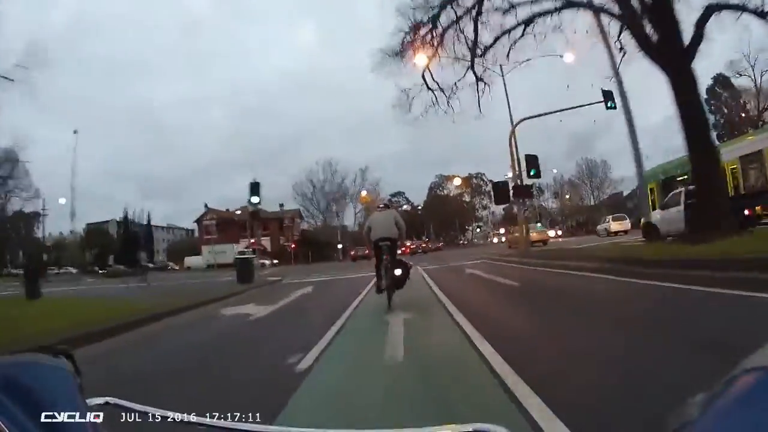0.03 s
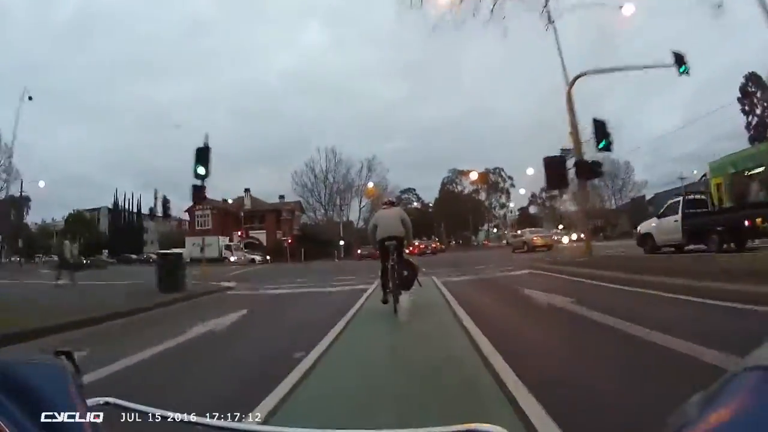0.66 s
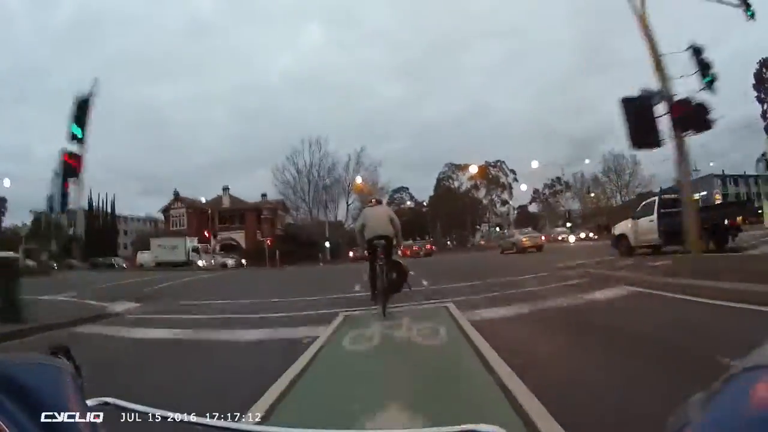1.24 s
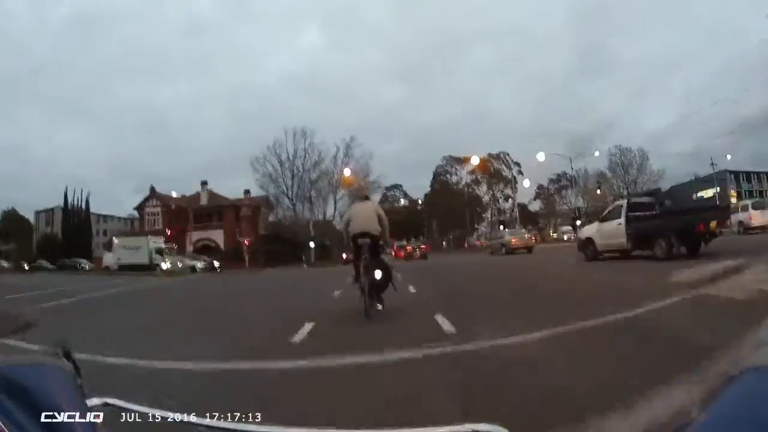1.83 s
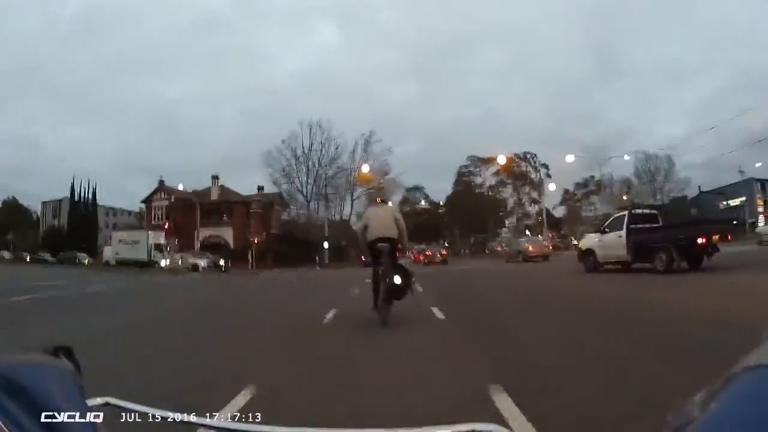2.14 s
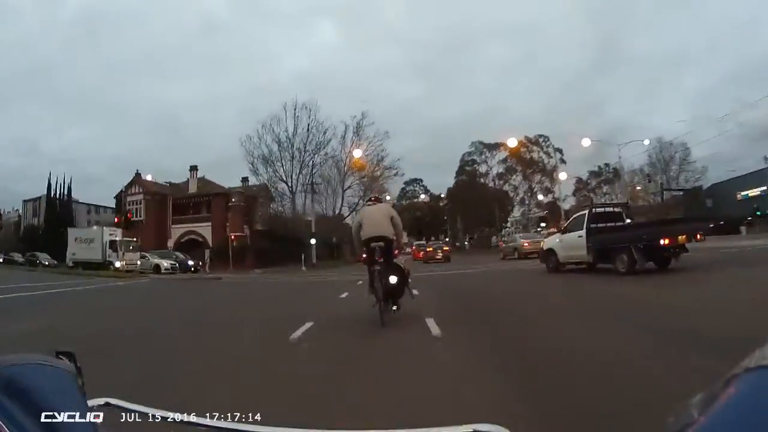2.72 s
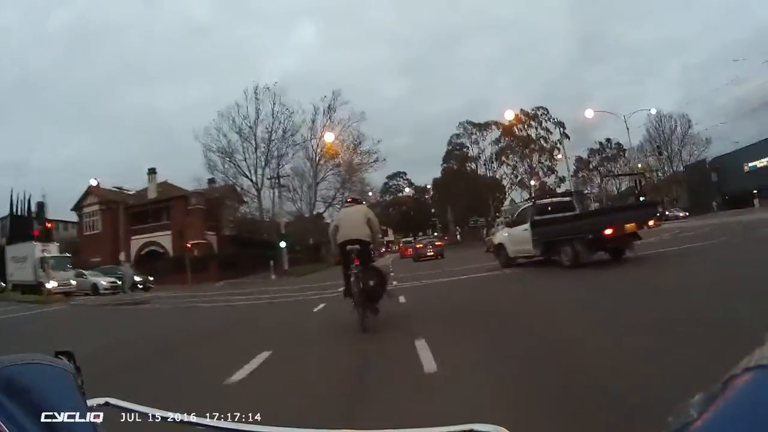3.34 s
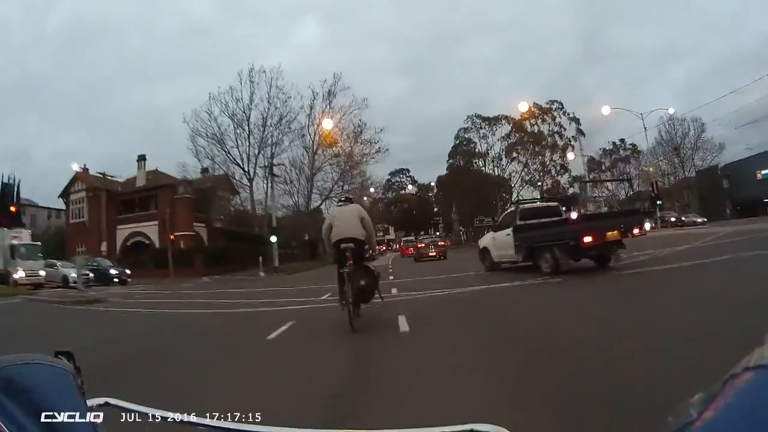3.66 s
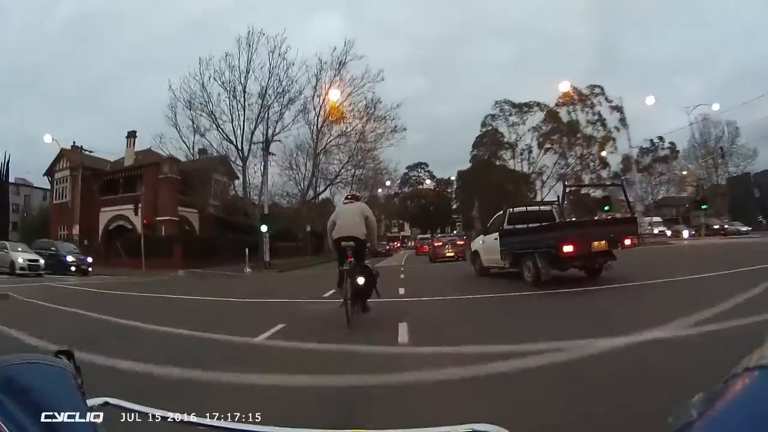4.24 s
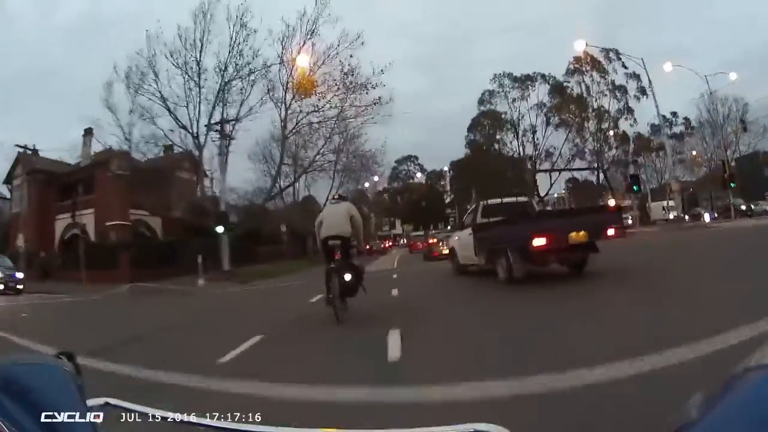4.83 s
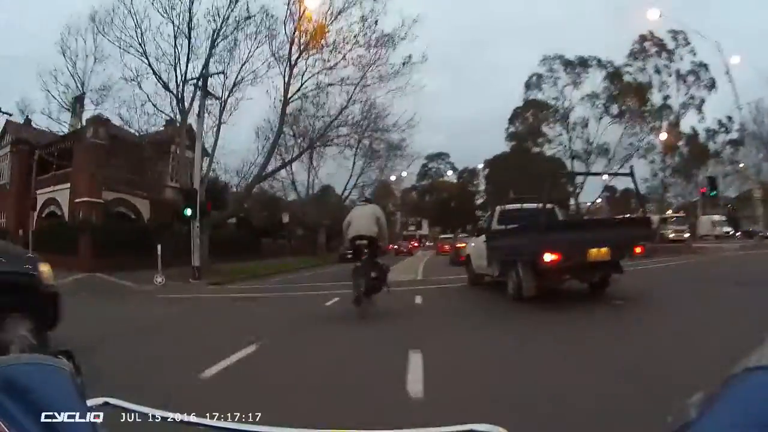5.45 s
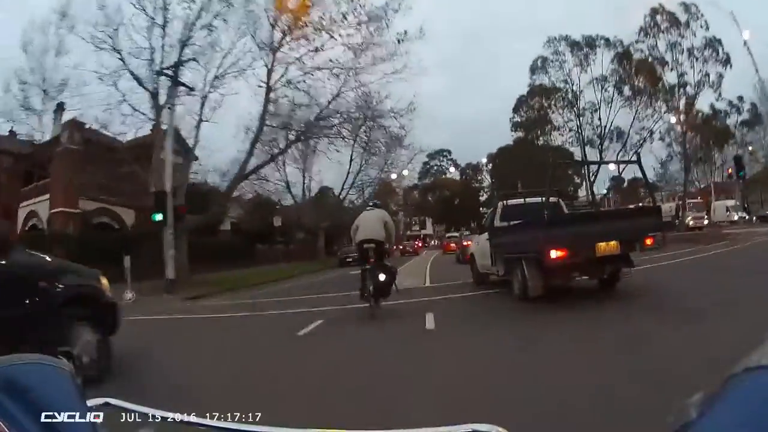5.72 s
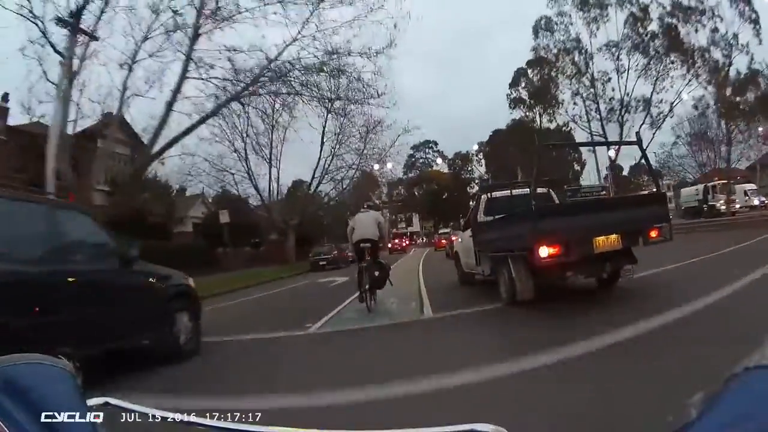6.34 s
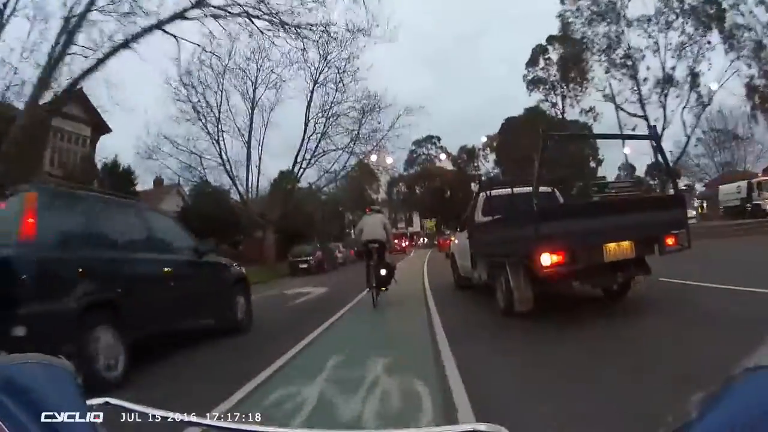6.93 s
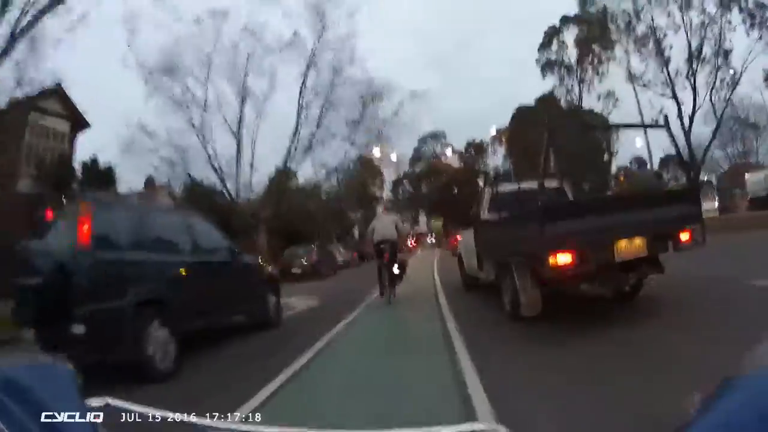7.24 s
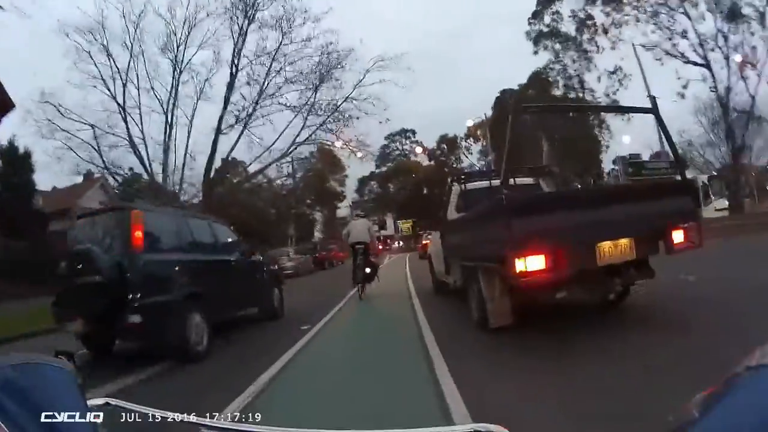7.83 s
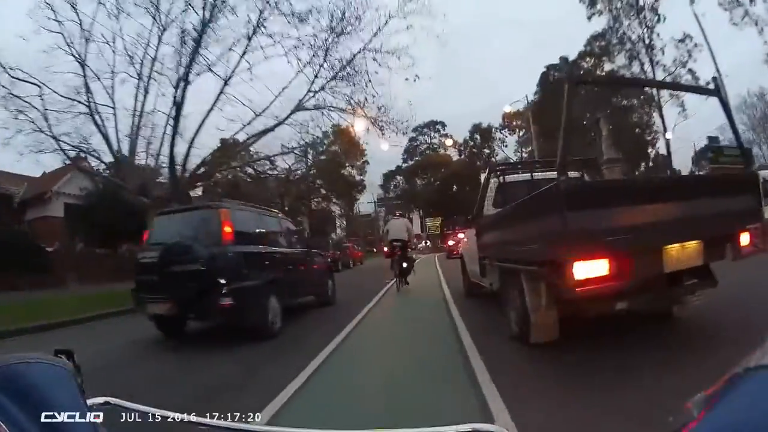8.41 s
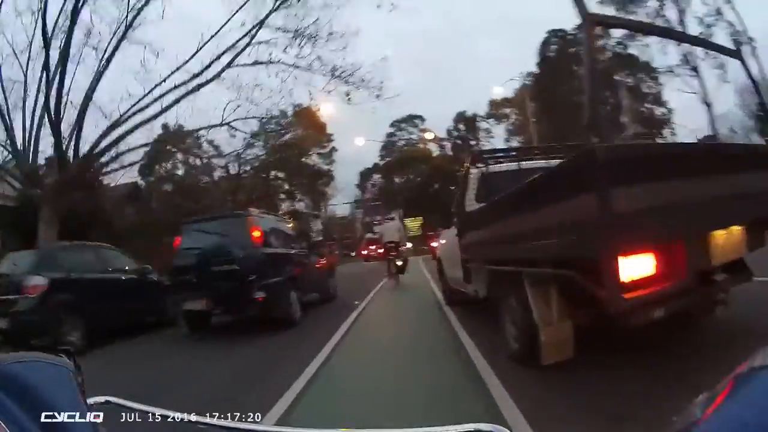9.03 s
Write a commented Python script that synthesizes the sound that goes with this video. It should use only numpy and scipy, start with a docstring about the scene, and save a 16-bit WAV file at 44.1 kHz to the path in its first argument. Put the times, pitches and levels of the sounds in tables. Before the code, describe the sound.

A bicycle rides through a city intersection, heard from a microphone on the handlebar. Rough asphalt hums low through the bike while wind buffets and crackles in gusts. The freewheel pings softly at first, then gives way to a faint chain whirr and a low throb of pedalling. Loose fittings knock now and then, and two harder bumps come near the end. Cars rush faintly alongside.

```python
"""A bicycle rolls through a city intersection, heard from a camera on its handlebar.
Rough asphalt hums through the frame; seams thump and loose fittings rattle. The rider coasts
on a pinging freewheel and pedals in spells with a whirring chain. Wind buffets the microphone and
crackles in the gusts; the camera's limiter ticks at loud peaks. Slow cars rush alongside.
The camera's plastic housing colours everything but the ticks and the crackle."""
import sys
import numpy as np
from scipy import signal
from scipy.fft import rfft, irfft, next_fast_len
from scipy.io import wavfile
from scipy.ndimage import uniform_filter1d, map_coordinates

SR = 44100
rng = np.random.default_rng(int(sys.argv[2]) if len(sys.argv) > 2 else 0)


def store_pcm(level_fs):
    """Save levels as 16-bit WAV."""
    pcm = np.round(np.clip(level_fs, -1, 1) * 32767).astype(np.int16)
    wavfile.write(sys.argv[1], SR, np.atleast_2d(pcm).T)


N = 404397

# how hard the road shakes the bicycle: (time [s], level [dB])
ROAD_SHAKE = [(0, 6), (0.16, 1), (0.32, 5.5), (0.5, -1), (0.7, 1), (0.93, -0.5), (1.2, 3.5), (1.83, 0.5),
              (2.1, -1.5), (2.72, -3.5), (3.2, -0.5), (3.9, -1.5), (4.5, 2), (6.1, 2.5), (7.05, 0),
              (7.55, -2.5), (8.47, -2), (8.8, 0), (9.17, 0.5)]
# fader ride of the low throb: (time [s], level [dB])
THROB_LEVEL = [(0, -28.5), (0.27, -35), (0.4, -23.5), (0.6, -41), (1.6, -34), (1.88, -29), (2.75, -36.5),
               (4.4, -26), (4.9, -27), (6.3, -26.5), (7.6, -31), (9.17, -32)]
# tone of the frame's hum, the throb and the tyres' drone: (frequency [Hz], level [dB])
HUM_TONE = [(30, -25), (60, -9.5), (100, -8), (130, -8), (155, 1), (190, -2.5), (220, -13.5), (320, -41.5),
            (1000, -120)]
THROB_TONE = [(60, -55), (98, -13.5), (118, -1), (132, -1), (146, -4), (168, -14), (450, -120)]
DRONE_TONE = [(120, -20), (215, -3.5), (280, 2.5), (320, -8), (360, -3), (388, -8.5), (428, -1),
              (495, -16.5), (535, -13), (600, -24.5), (700, -18), (1000, -31), (2400, -40), (9000, -120)]


def road(hum_db=-32, hum_follow=0.87, drone_db=-39, stroke_db=2):
    """Asphalt shakes the frame's low resonances, a throb pumps with the pedals, the tyres drone."""
    road_db, = curves(ROAD_SHAKE)
    throb_db, = curves(THROB_LEVEL)
    hum = amp(hum_db + hum_follow * road_db) * even(noise(HUM_TONE), span_s=0.32)
    throb = amp(throb_db + stroke_db * pedal_strokes()) * even(noise(THROB_TONE), span_s=0.23)
    drone = amp(drone_db + road_db + 1.4 * wobble(30)) * noise(DRONE_TONE)
    return hum + throb + drone


# surges of the low throb: (crest time [s], width [s], level [dB])
THROB_SURGES = [(1.84, 0.13, -23.5), (2.257, 0.087, -22), (4.85, 0.083, -20), (5.019, 0.043, -16),
                (5.201, 0.071, -20.5), (5.497, 0.064, -26.5), (5.976, 0.084, -19.5), (6.317, 0.064, -15.5),
                (6.87, 0.04, -20.5), (7.03, 0.089, -20.5)]


def throb_surges(centre_hz=136, waver=0.0819):
    """The low throb surges briefly near 136 Hz, unsteady in pitch."""
    t = np.arange(N) / SR
    envelope = sum(amp(db) * swell(t, s, width) for s, width, db in THROB_SURGES)
    pitch_hz = centre_hz * (1 + waver * wobble(60))
    return envelope * np.sin(2 * np.pi * np.cumsum(pitch_hz) / SR)


# the wheels hit seams in the road: (time [s], level [dB], hardness [dB/octave])
SEAMS = [(0.681, -25.5, -1), (3.422, -26.5, -2), (5.372, -25.5, 4.5), (7.208, -7.5, -1.5),
         (7.237, -18.5, -1), (7.409, -26, -4), (8.811, -31.5, 9.5), (8.821, -13.5, 1.5)]
# ring of the handlebar: (frequency [Hz], level [dB], t60 [s])
HANDLEBAR_MODES = [(34.96, -8.5, 0.61), (60.5, -9, 0.19), (127, -4, 0.18), (167.5, -0.5, 0.13),
                   (278, -12, 0.046), (413, -13.5, 0.054), (645, -24, 0.044), (1210, -29, 0.036)]


def bumps(attack_s=0.002, pivot_hz=165):
    """Each seam jolts the handlebar into a deep shudder; a hard edge brings out the upper modes."""
    out, t = np.zeros(N), np.arange(SR // 2) / SR
    for s, db, hardness in SEAMS:
        shudder = sum(mode(t, hz, level + hardness * np.log2(hz / pivot_hz), t60)
                      for hz, level, t60 in HANDLEBAR_MODES)
        add(out, s, amp(db) * shudder * (1 - np.exp(-t / attack_s)))
    return out


# metal on metal at the big jolt, and dull clunks of the camera's mount: (time [s], level [dB])
METAL_HITS = [(7.2165, -27)]
MOUNT_HITS = [(0.6755, -26), (5.94, -31)]
# ring of the metal and of the mount: (frequency [Hz], level [dB], t60 [s])
METAL_MODES = [(2040, 2.5, 0.0094), (3150, 0.5, 0.0071), (3410, -5, 0.0067), (4400, -5, 0.0066),
               (5100, -12, .006), (10400, -10, 0.0045), (10900, -10, .004)]
MOUNT_MODES = [(424, 0, 0.036), (620, -1.5, .02), (830, -9, 0.011)]


def blows(hits, modes, attack_s):
    """Each blow rings the struck part's few damped modes."""
    out, t = np.zeros(N), np.arange(SR // 10) / SR
    ring = sum(mode(t, hz, level, t60) for hz, level, t60 in modes)
    for s, db in hits:
        add(out, s, amp(db) * ring * (1 - np.exp(-t / attack_s)))
    return out


# knocks of the loose fittings: (time [s], level [dB], clack offset [dB], edge offset [dB])
KNOCKS = [(0.3619, -40, 3, -19), (0.454, -36, -6, -33), (1.561, -42, -5, -28), (1.87, -42.5, 2, -8),
          (2.246, -38, -2, -16), (2.329, -48, 5, 8), (3.4237, -30, -16, -19), (4.726, -34, -13, -30),
          (5.374, -30, -5, -16.5), (5.9389, -29.5, -4, -6.5), (6.414, -33, -6, -18),
          (7.199, -34.5, -1, -14), (7.2255, -29.5, -8, -28), (7.23, -43, 6, -26), (7.2942, -40, -3, -17),
          (7.3332, -36, -14, -26), (7.366, -42.5, 4, -21), (7.379, -37, 0, -17), (7.394, -41, -11.5, -24),
          (7.439, -39, -10, -24), (7.542, -37, -2, -6.5), (8.05, -31, -6.5, -3), (8.806, -35, 0.5, -12),
          (8.8123, -33, -1, -5.5), (9.002, -40.5, -4.5, -21)]
# ring of the fittings: (frequency [Hz], level [dB], t60 [s])
FITTING_MODES = [(1166, -15.5, 0.05), (2424, -1.5, 0.026), (2580, 4, 0.022), (2903, -7, .03),
                 (3436, -15.5, 0.034), (4320, -26.5, 0.032), (6200, -30.5, 0.04)]
# tone of a knock's clack and edge: (frequency [Hz], level [dB])
CLACK_TONE = [(300, -12.5), (1200, -3), (2100, 1), (3000, -13), (5000, -26), (9000, -35), (13000, -52.5)]
EDGE_TONE = [(1000, -20.5), (2400, -3), (3100, 2), (4000, -5), (5000, -9), (6300, -3.5), (7700, -9),
             (9000, -9), (11000, -18), (12300, -34)]


def rattle(ring_db=-6, clack_db=-2, edge_db=-5, clack_t60=0.042, edge_t60=0.009, attack_s=0.00065):
    """Loose fittings knock: a dull clack, a bright edge and a brief ring that varies hit to hit."""
    ring, clack, edge = np.zeros((3, N))
    t = np.arange(SR // 10) / SR
    rise = 1 - np.exp(-t / attack_s)
    for s, db, body_db, bright_db in KNOCKS:
        modes = sum(mode(t, db=level + rng.normal(0, 1.3), hz=hz * rng.normal(1, 0.019), t60=t60)
                    for hz, level, t60 in FITTING_MODES)
        add(ring, s, amp(db + ring_db) * rise * modes)
        add(clack, s, amp(db + body_db + clack_db - 60 * t / clack_t60) * rise)
        add(edge, s, amp(db + bright_db + edge_db - 60 * t / edge_t60) * rise)
    return ring + clack * noise(CLACK_TONE) + edge * noise(EDGE_TONE)


# how hard the fittings buzz: (time [s], level [dB])
BUZZ_LEVEL = [(0, -58.5), (2.6, -70.5), (3.1, -53), (4.4, -53.5), (7, -50), (7.7, -54.5), (8.2, -51),
              (8.5, -57), (8.8, -44), (9.17, -50.5)]


def chatter(taps_per_s=55, spread_db=2, attack_s=0.0029, detune=0.022):
    """The same fittings buzz faintly, each mode tapped at its own random moments, slightly detuned."""
    buzz_db, = curves(BUZZ_LEVEL)
    out, t = np.zeros(N), np.arange(SR // 25) / SR
    rise = 1 - np.exp(-t / attack_s)
    for hz, db, t60 in FITTING_MODES:
        taps = np.flatnonzero(rng.random(N) < taps_per_s / SR)
        size, pitch = rng.standard_normal((2, N))
        for at in taps:
            tap_db = buzz_db[at] + db + spread_db * size[at]
            add(out, at / SR, rise * mode(t, hz * (1 + detune * pitch[at]), tap_db, t60))
    return out


# spells of pedalling: (start [s], release [s])
PEDAL_SPELLS = [(2.8, 6), (7.2, 7.3), (8.35, 9.17)]


def pedal_load(take_up_s=0.61, let_go_s=0.35):
    """Load on the pedals, 0 to 1: the legs take it up and let it go in each spell."""
    t = np.arange(N) / SR
    ramps = [np.minimum((t - start) / take_up_s, 1 - (t - end) / let_go_s)
             for start, end in PEDAL_SPELLS]
    return np.clip(ramps, 0, 1).max(axis=0)


def pedal_strokes(strokes_per_s=2.65, downstroke_at_s=5.94):
    """The swing of the pedal strokes, -1 to 1, still while coasting."""
    return pedal_load() * np.cos(2 * np.pi * strokes_per_s * (np.arange(N) / SR - downstroke_at_s))


# fader ride of the chain: (time [s], level [dB])
CHAIN_LEVEL = [(0, -84.5), (2.6, -84.5), (3, -77), (3.4, -71.5), (3.9, -72), (4.55, -66.5), (4.8, -76),
               (5, -70.5), (5.6, -69), (6.25, -66.5), (6.9, -69.5), (7.7, -74.5), (8.05, -66.5), (8.3, -75),
               (8.55, -81), (8.8, -73), (9.17, -71)]
# ring of the links: (frequency [Hz], width [Hz], level [dB])
LINK_BANDS = [(2540, 110, 6), (2866, 70, 5), (3110, 91, 0), (3544, 65, 3), (4440, 65, -5.5),
              (6400, 110, -7), (7120, 150, 2), (7950, 230, -16), (8560, 250, -14.5)]


def chain(links_per_s=65, grain=0.7, flutter_db=1.2, stroke_db=1.4, road_follow=0.46, drift=0.002):
    """Links seat on the sprockets and ring in narrow, drifting bands, louder on each pedal stroke."""
    effort_db, = curves(CHAIN_LEVEL)
    road_db, = curves(ROAD_SHAKE)
    link_phase = 2 * np.pi * np.cumsum(links_per_s * (1 + 0.049 * wobble(12))) / SR
    bands = lambda hz: sum(amp(db) * resonance(hz, centre, width) for centre, width, db in LINK_BANDS)
    ring = filtered(rng.standard_normal(N), bands)
    ring = map_coordinates(ring, [np.cumsum(1 + drift * wobble(6))], mode="mirror")  # varispeed
    level_db = effort_db + road_follow * road_db + stroke_db * pedal_strokes() + flutter_db * wobble(25)
    return amp(level_db) * unit(ring * (1 + grain * np.cos(link_phase)))


def drive_whirr(ring_hz=4400, width_hz=110, crest_s=4.5, width_s=1.2, level_db=-81, flutter_db=3):
    """For a while the drive rubs and sings roughly on one narrow metallic band."""
    envelope = amp(level_db + flutter_db * wobble(50)) * swell(np.arange(N) / SR, crest_s, width_s)
    ring = filtered(rng.standard_normal(N), lambda hz: resonance(hz, ring_hz, width_hz))
    return envelope * unit(ring)


def freewheel(pings_per_s=30, level_db=-54.5, partials_hz=(2490, 2850, 4420), rise_s=0.0034,
              jitter_s=0.009, road_follow=0.66, roughness=0.25):
    """The pawls ping softly and unevenly as the bicycle coasts, louder on rough asphalt."""
    road_db, = curves(ROAD_SHAKE)
    coasting = (1 - pedal_load()) * amp(road_follow * road_db + 2.2 * wobble(7))
    clicks = np.flatnonzero(np.diff(np.floor(np.arange(N) * pings_per_s / SR)))
    out, t = np.zeros(N), np.arange(SR // 25) / SR
    envelope = (t / rise_s) ** 2 * np.exp(2 * (1 - t / rise_s))
    for at in clicks:
        late, size, pitch, bright = rng.standard_normal(4)
        low, mid, top = (np.sin(2 * np.pi * hz * (1 + 0.025 * pitch) * t) for hz in partials_hz)
        ping = envelope * (low + amp(-11 + 2.1 * bright) * mid + amp(-23) * top)
        add(out, at / SR + jitter_s * late, coasting[at] * amp(level_db + 1.9 * size) * ping)
    return out * (1 + roughness * wobble(500))


# gusts on the microphone: (crest time [s], width [s], level [dB])
WIND_GUSTS = [(0.41, 0.19, -17), (0.784, 0.11, -14.5), (1.392, 0.17, -16), (1.859, 0.25, -13.5),
              (2.3, 0.16, -14), (4.626, 0.17, -16), (5.186, 0.15, -18.5), (5.391, 0.04, -14),
              (5.804, 0.056, -18), (6.096, 0.06, -25.5), (6.367, 0.17, -18.5), (6.75, 0.099, -18),
              (7.048, 0.082, -13.5), (7.237, 0.073, -11.5), (7.424, 0.051, -17.5), (8.337, 0.09, -20.5)]
# dips in the breeze: (time [s], width [s], depth [dB])
WIND_LULLS = [(1.155, 0.1, 5), (2.9, 0.091, 7), (3.87, 0.11, 8), (7.604, .16, 6), (8.504, .1, 6)]


def wind_levels(breeze_db=-25.5, road_follow=0.93):
    """Two envelopes in dB: a breeze that follows the road shake, less its lulls, and the gusts."""
    road_db, = curves(ROAD_SHAKE)
    t = np.linspace(0, N / SR, N // 200)  # coarse control rate
    gust_power = sum(amp(db) ** 2 * swell(t, s, width) for s, width, db in WIND_GUSTS)
    lulls = sum(db * swell(t, s, width) for s, width, db in WIND_LULLS)
    lull_db, gust_db = curves(np.column_stack([t, lulls, 10 * np.log10(gust_power + 1e-12)]))
    return breeze_db + road_follow * road_db - lull_db, gust_db


# the wind's rumble, and the EQ that adds weight and roar to gusts: (frequency [Hz], level [dB])
WIND_TONE = [(8, -11.5), (18, -6.5), (28, 0), (45, -13.5), (65, -11), (95, -19.5), (200, -37.5),
             (500, -59.5), (1500, -110)]
GUST_EQ = [(25, 1), (45, 3), (70, -3.5), (150, 0.5), (300, -2.5), (550, 16.5), (1200, 9)]


def wind(unrest_db=1.36):
    """Eddies push on the microphone port: a restless breeze and heavier gusts."""
    breeze_db, gust_db = wind_levels()
    breeze = amp(breeze_db + unrest_db * wobble(9)) * even(noise(WIND_TONE), span_s=0.14)
    roar = filtered(noise(WIND_TONE), shape(GUST_EQ))
    return breeze + amp(gust_db) * even(roar, span_s=0.14)


# the limiter's loudest ticks: (time [s], level [dB])
TICK_CUES = [(0.304, -38), (0.3513, -35.5), (0.3645, -36.5), (0.535, -41.5), (0.728, -37), (0.7643, -37),
             (0.7776, -40.5), (0.792, -36.5), (1.3687, -38.5), (1.393, -35.5), (1.406, -40.5), (1.609, -29),
             (1.74, -42), (1.7984, -37), (1.8247, -42), (1.8505, -40.5), (1.968, -41.5), (1.991, -38),
             (2.2023, -38.5), (2.3294, -35.5), (2.367, -37.5), (2.3937, -37.5), (4.607, -36), (4.628, -42),
             (4.963, -45), (5.1558, -40), (5.576, -40.5), (6.302, -35.5), (6.3638, -43.5), (6.715, -35),
             (6.8533, -38), (6.9634, -39.5), (7.1992, -40), (7.222, -35.5), (7.2524, -37.5), (7.428, -43.5),
             (8.051, -44.5)]
# colour of the ticks: (frequency [Hz], gain [dB])
TICK_EQ = [(500, 5), (2000, 1.5), (4400, 1), (11000, -0.5), (13500, -6), (16000, -8.5)]


def limiter_ticks(trim_db=4, decay_s=0.0003, gate_db=-18, faint_per_s=28, faint_db=-54, spread_db=5.5):
    """Dry ticks of the limiter's gain steps: loud ones on cue, fainter ones at random in strong gusts."""
    out, t = np.zeros(N), np.arange(SR // 100) / SR
    _, gust_db = wind_levels()
    at = np.flatnonzero((rng.random(N) < faint_per_s / SR) & (gust_db > gate_db))
    sizes_db = faint_db + spread_db * rng.standard_normal(N)
    for s, db in [*TICK_CUES, *zip(at / SR, sizes_db[at])]:
        add(out, s, amp(db + trim_db) * np.exp(-t / decay_s))
    return filtered(out, shape(TICK_EQ))


# tone of the crackle: (frequency [Hz], level [dB])
CRACKLE_TONE = [(1200, -22.5), (2800, 5), (5000, -5), (7000, -6), (11000, -20.5), (14000, -38.5)]


def crackle(grains_per_s=130, trim_db=-42, steepness=1.4, spread_db=2, decay_s=0.0014):
    """A ragged crackle grows steeply with the wind and stands out only in strong gusts."""
    wind_db = np.maximum(*wind_levels())
    onsets = rng.random(N) < grains_per_s / SR
    grains = onsets * amp(steepness * wind_db + trim_db + spread_db * rng.standard_normal(N))
    tail = np.exp(-np.arange(SR // 50) / SR / decay_s)
    return signal.oaconvolve(grains, tail)[:N] * noise(CRACKLE_TONE)


# nearness of the cars: (time [s], rush level [dB], tyre hiss level [dB])
CAR_LEVELS = [(0, -50, -83), (1.6, -51, -82.5), (2.6, -52, -84), (3.3, -50, -81), (4.4, -49, -81),
              (6.2, -48, -79.5), (7.1, -48.5, -79.5), (7.7, -53, -80.5), (8.25, -51, -78),
              (8.5, -51.5, -82), (8.75, -50, -78), (9.17, -54, -78)]
# tone of their rush and hiss: (frequency [Hz], level [dB])
RUSH_TONE = [(200, -11), (450, 1.5), (700, -1), (1000, -2), (2000, -4), (2600, -16), (3200, -21.5),
             (3900, -27.5), (5000, -38.5), (10000, -44.5), (15000, -74.5)]
HISS_TONE = [(1500, -30), (3000, -0.5), (4500, -0.5), (6000, -2.5), (8500, -4.5), (10500, -7.5),
             (12500, -13.5), (15500, -33.5)]


def traffic(rush_trim_db=-1.07, hiss_trim_db=6, road_follow=0.5, flutter_db=3):
    """Cars rush alongside, louder on rough asphalt; their tyres hiss as they come close."""
    road_db, = curves(ROAD_SHAKE)
    rush_db, hiss_db = curves(CAR_LEVELS) + road_follow * road_db
    rush = amp(rush_db + rush_trim_db + 1.3 * wobble(45)) * noise(RUSH_TONE)
    hiss = amp(hiss_db + hiss_trim_db + flutter_db * wobble(110)) * noise(HISS_TONE)
    return rush + hiss


# peaks and dips of the camera housing: (frequency [Hz], width [Hz], gain [dB])
HOUSING_EQ = [(1142, 130, 6.5), (1357, 66, -6), (1417, 85, 5.5), (1545, 39, -2.5), (1812, 47, 5),
              (2066, 92, 7.5), (2126, 170, -5.5), (2444, 130, 3.5), (2675, 160, -6.5), (2780, 110, 4.5),
              (3220, 140, 2), (3420, 190, 1.5), (4380, 200, 4)]


def housing(hz):
    """Gain of the plastic shell, whose resonances act as a bank of bell EQs."""
    return amp(sum(db * np.exp(-2 * ((hz - centre) / width) ** 2) for centre, width, db in HOUSING_EQ))


def amp(db):
    """Decibels to gain."""
    return 10 ** (np.asarray(db) / 20)


def unit(x):
    """x at rms 1."""
    return x / np.sqrt(np.mean(x ** 2) + 1e-20)


def curves(rows):
    """One value per sample for each column after the time."""
    s, *cols = np.transpose(rows)
    return [np.interp(np.arange(N) / SR, s, c) for c in cols]


def wobble(rate):
    """A smooth random curve, rate knots a second."""
    return map_coordinates(rng.standard_normal(int(N * rate / SR) + 4), [np.arange(N) * rate / SR])


def swell(t, crest, width):
    """A bell-shaped envelope, width seconds across at half height."""
    return 0.5 ** ((2 * (t - crest) / width) ** 2)


def mode(t, hz, db, t60):
    """A sine that dies away by 60 dB in t60 seconds."""
    return amp(db - 60 * t / t60) * np.sin(2 * np.pi * hz * t)


def resonance(hz, centre, width):
    """Gain of one resonant band."""
    return 1 / (1 + 2 * ((hz - centre) / width) ** 2)


def shape(points):
    """Gain against frequency through (Hz, dB) points on a log axis."""
    f, db = np.transpose(points)
    return lambda hz: amp(np.interp(np.log(hz + 1), np.log(f + 1), db))


def filtered(x, gain):
    """x through the causal (minimum-phase) filter with this gain."""
    m = 2 * next_fast_len(N // 2 + SR // 2)
    cepstrum = irfft(np.log(np.maximum(gain(np.fft.rfftfreq(m, 1 / SR)), 1e-6)), m)
    cepstrum[1:m // 2] *= 2
    cepstrum[m // 2 + 1:] = 0
    return irfft(rfft(x, m) * np.exp(rfft(cepstrum)), m)[:N]


def noise(spectrum):
    """Coloured noise of rms 1."""
    m = 2 * next_fast_len(N // 2 + 4096)
    gain = shape(spectrum)(np.fft.rfftfreq(m, 1 / SR))
    return unit(irfft(rfft(rng.standard_normal(m)) * gain, m)[:N])


def even(x, span_s):
    """A leveller: irons out swells longer than span_s."""
    envelope = np.abs(signal.hilbert(x, next_fast_len(N))[:N])
    power = uniform_filter1d(envelope ** 2, max(2, int(span_s * SR)))
    return unit(x / np.sqrt(np.abs(power) + 1e-3))


def add(track, s, sound):
    """Mix a sound into the track at time s."""
    part = track[max(0, round(s * SR)):][:len(sound)]
    part += sound[:len(part)]


def scene():
    """Bicycle, wind and street reach the microphone through its housing; ticks and crackle sit on top."""
    impacts = bumps() + rattle()
    impacts += blows(METAL_HITS, METAL_MODES, attack_s=0.00036)
    impacts += blows(MOUNT_HITS, MOUNT_MODES, attack_s=0.0006)
    bicycle = road() + throb_surges() + chain() + drive_whirr() + freewheel() + chatter() + impacts
    return (filtered(bicycle + wind() + traffic(), housing) + limiter_ticks() + crackle())[None]


def record(dry):
    """The camera keeps nothing above its band limit."""
    top_hz = 15850
    m = next_fast_len(N + SR // 2)
    return irfft(rfft(dry, m) * (np.fft.rfftfreq(m, 1 / SR) < top_hz), m)[..., :N]


dry = scene()
out = record(dry)
store_pcm(out)
```